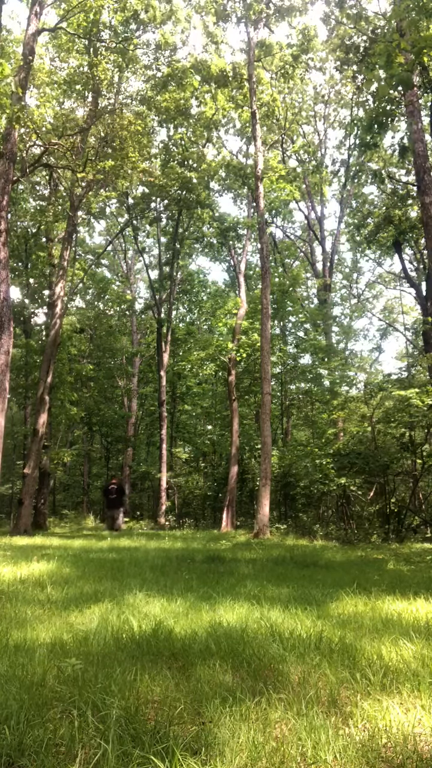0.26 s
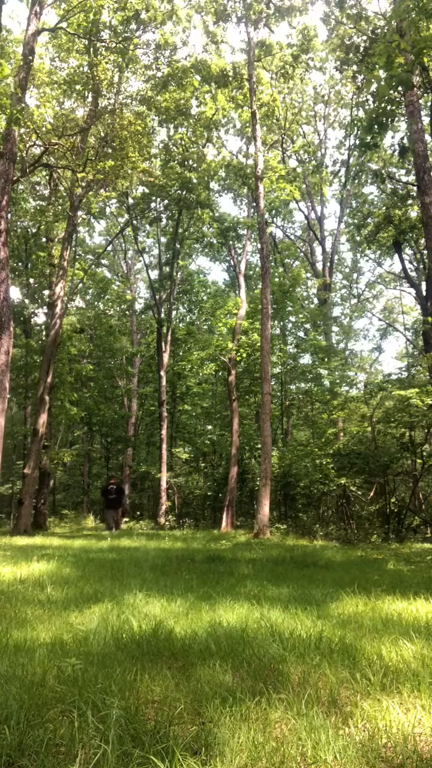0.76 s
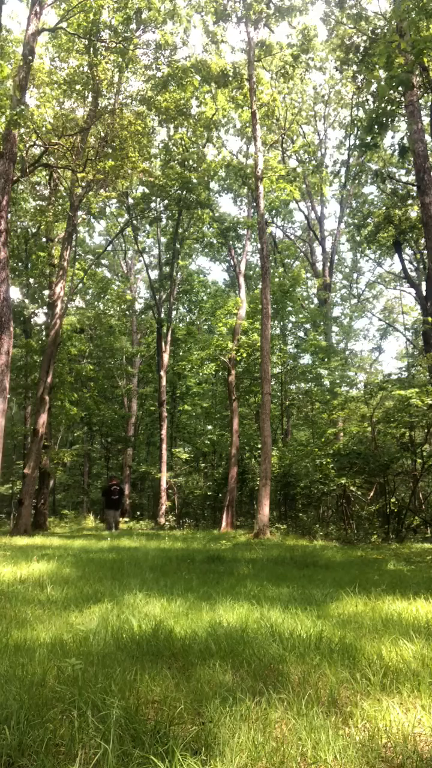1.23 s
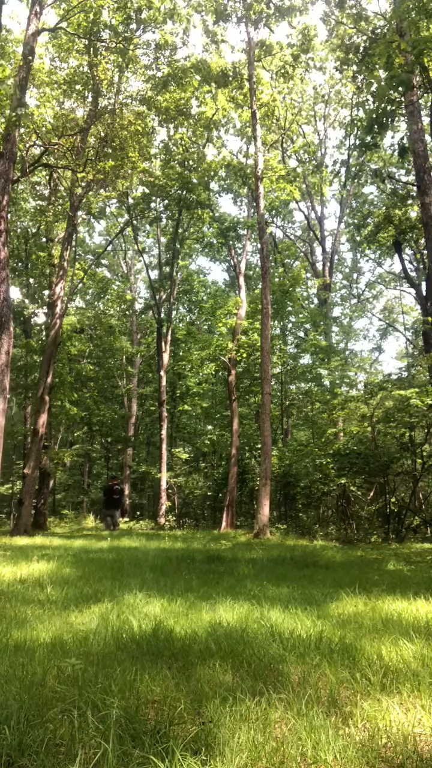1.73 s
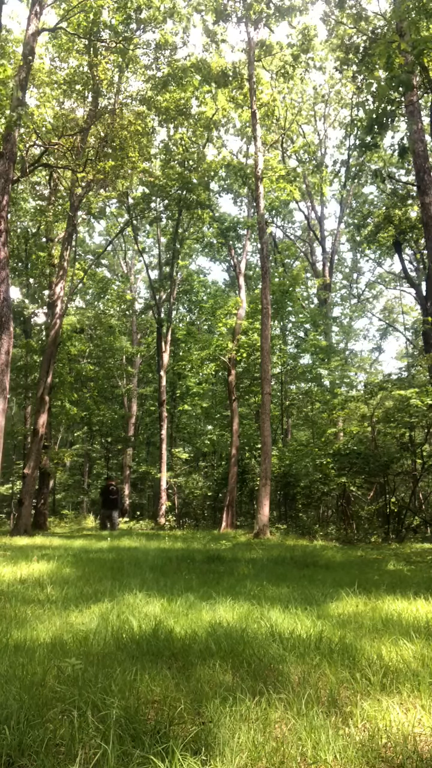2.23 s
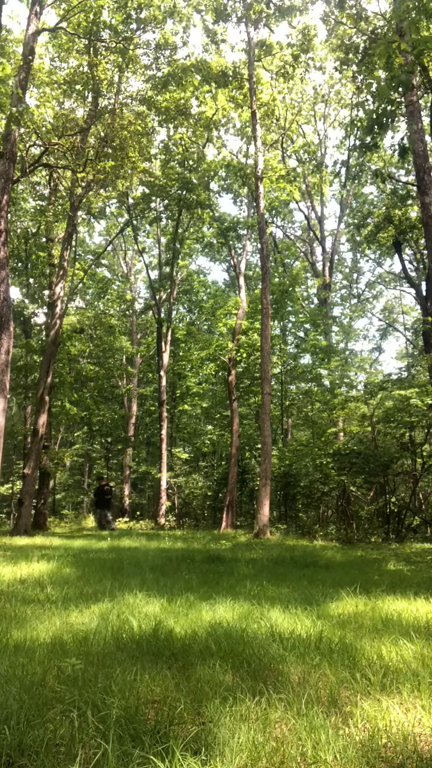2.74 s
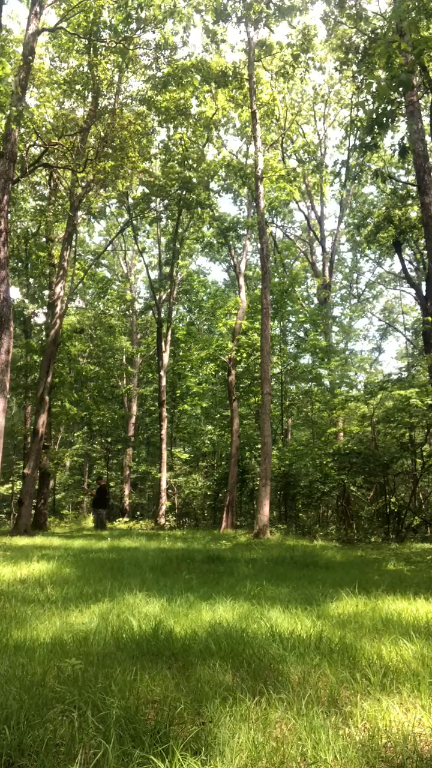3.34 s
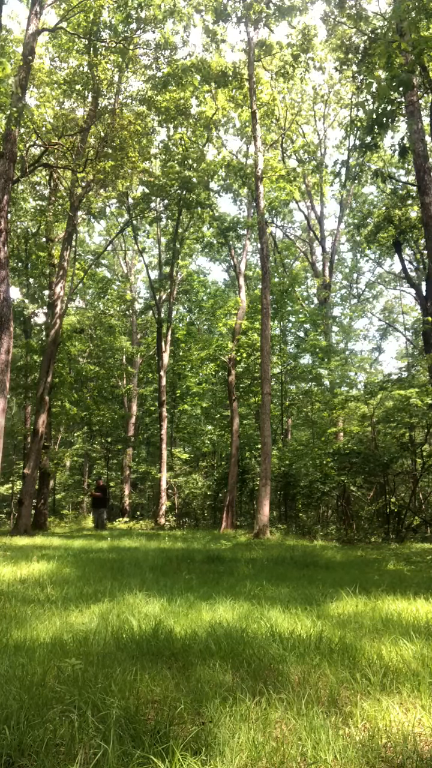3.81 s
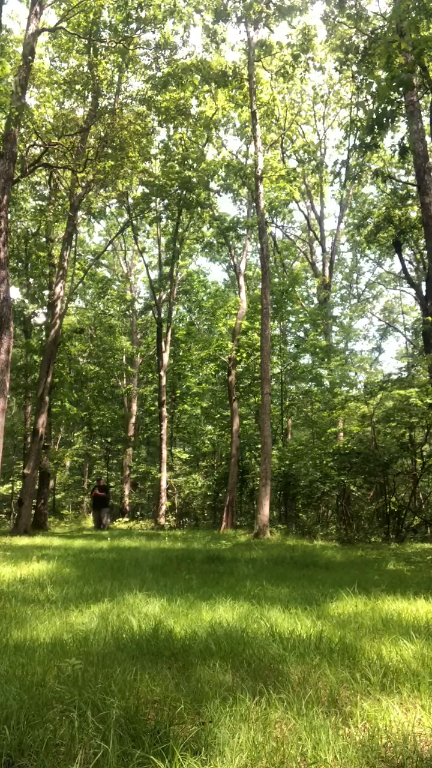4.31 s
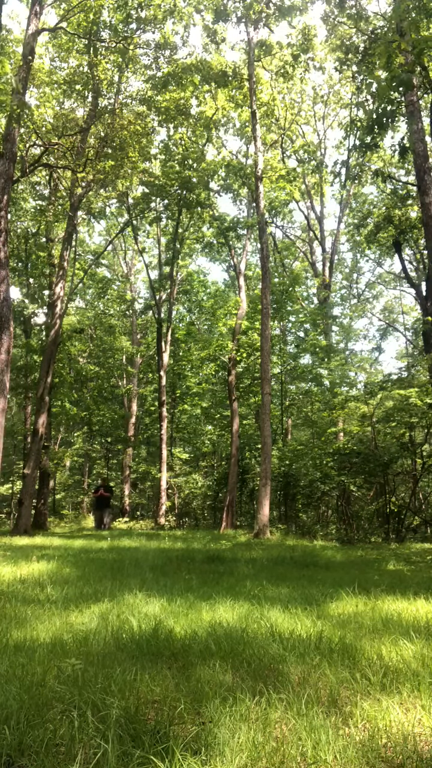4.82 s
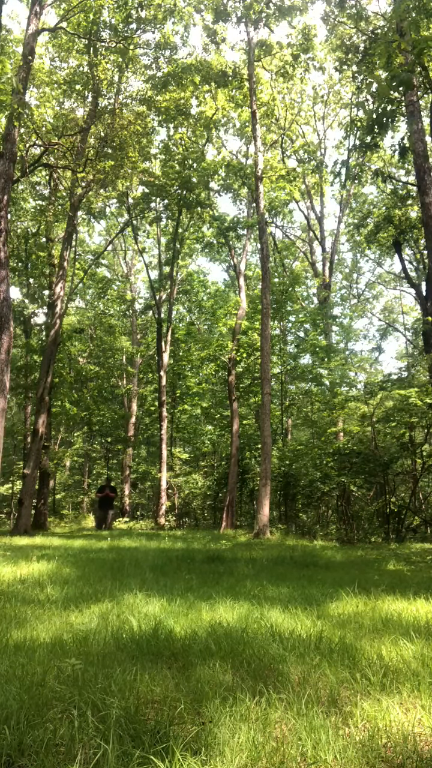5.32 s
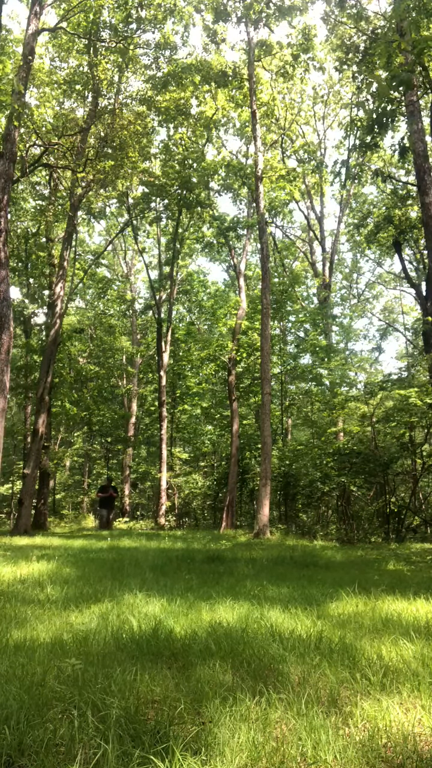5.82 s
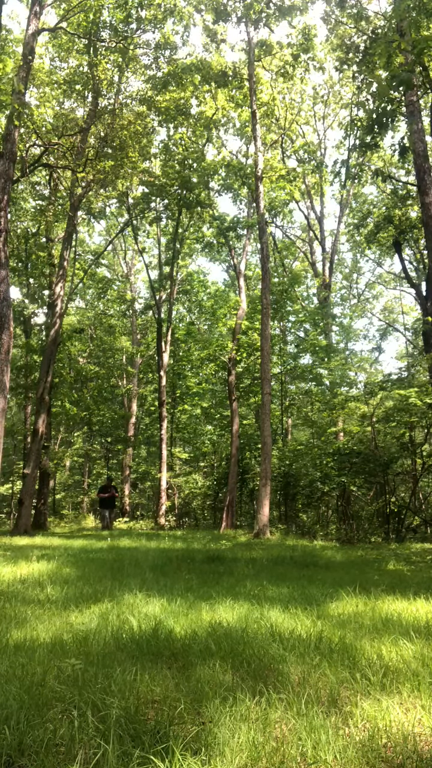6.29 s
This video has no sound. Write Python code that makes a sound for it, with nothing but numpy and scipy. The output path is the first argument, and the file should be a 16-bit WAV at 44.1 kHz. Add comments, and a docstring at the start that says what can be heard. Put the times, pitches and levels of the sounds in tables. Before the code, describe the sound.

Outdoors in a quiet forest clearing, four quick raspy turkey-like yelps from a wooden box call sound far off, each breaking from clear to hoarse. After a pause with faint bird whistles and dull microphone bumps, twenty nearer, shorter squeaky strokes follow, slowing and dropping in pitch, some cracking into rasp. Trees echo every note over soft air, low rumble and a distant engine hum.

```python
"""Box call in a forest clearing

Four raspy yelps come from far off, then a near run of twenty short strokes that slow down and sink in pitch.
The wooden lid sticks and slips on the box's lip, made of jittering harmonics and scraping noise; at times it
breaks into a lower rasp. Filtered noise bursts make the trees answer each note and the thin bird whistles.
Under it lie coloured-noise air and rumble, a distant engine's hum, a faint far tone and bumps on the microphone.
"""
import sys
import numpy as np
from scipy import signal
from scipy.fft import rfft, irfft, next_fast_len
from scipy.io import wavfile
from scipy.ndimage import map_coordinates

SR = 44100
rng = np.random.default_rng(int(sys.argv[2]) if len(sys.argv) > 2 else 0)


def unload_audio(sound):
    """Save the sound as a 16-bit wav file, at the path given as the first command line argument."""
    columns = np.transpose(np.atleast_2d(sound))
    # keep every value between -1 and 1, then stretch to whole-number steps
    steps = np.round(np.clip(columns, -1, 1) * 32767)
    wavfile.write(sys.argv[1], SR, steps.astype(np.int16))


N = 288855
LEAD = SR // 2  # samples of scene before time zero
TIME = np.arange(-LEAD, N) / SR  # s
TOP_HZ = 15800  # upper band limit at the microphone

# air in the trees: (frequency [Hz], relative density [dB per Hz])
AIR_SPECTRUM = [(15, -59), (25, -17.5), (59, -5), (122, -9.5), (152, -14), (227, -12.5), (260, -15),
                (421, -16), (523, -14.5), (582, -15), (848, -12), (2170, -28), (3630, -33), (5010, -36),
                (15500, -50.5)]
# low rumble: (frequency [Hz], relative density [dB per Hz])
RUMBLE_SPECTRUM = [(20, -24), (27, -22), (36, -14), (60, -3), (85, -6.5), (130, -16.5), (250, -32),
                   (600, -74)]
# hum of the distant engine, before its drift: (time [s], level [dB])
ENGINE_LEVEL = [(0, -66), (1.6, -65), (2.2, -72), (3.8, -61.5), (5.7, -57.5), (6.55, -63)]
# bumps on the microphone: (time [s], frequency [Hz], level [dB])
BUMPS = [(2.214, 57.6, -47), (2.53, 132, -50), (2.899, 123, -47), (3.162, 65, -45), (3.257, 114, -48.5)]
# bird whistles deep in the wood: (time [s], length [s], start pitch [Hz], end pitch [Hz], level [dB])
BIRD_NOTES = [(1.717, 0.14, 3560, 3830, -85), (1.855, 0.24, 3970, 4130, -85),
              (2.45, 0.081, 3640, 3660, -80), (2.539, 0.095, 3650, 3680, -80)]
# decay of the wood's answer: (frequency [Hz], time to fall 60 dB [s])
FOREST_DECAY = [(500, 0.14), (1500, 1.32), (2500, 1.16), (4500, 0.9), (8000, 0.69), (15000, 0.29)]
# what trunks and leaves scatter back: (frequency [Hz], gain [dB])
SCATTER = [(800, -9), (1450, 3), (1900, -7.5), (2150, -1.5), (2550, -2.5), (3100, 4.5), (4200, 7.5),
           (5200, 0), (7400, 6.5), (11000, 2.5), (15000, 3)]
# wood colour of the rubbing noise: (frequency [Hz], relative level [dB])
SCRAPE_COLOUR = [(600, -79), (1100, -68), (1400, -1), (1800, 6.5), (2400, -5.5), (3000, 8), (3500, -7),
                 (4500, -11.5), (6000, 0), (7000, -17.5), (10000, -24.5), (15000, -60)]
# far yelps: (start [s], break into rasp [s], end [s], rasp pitch at the end [Hz], level of the last judder [dB])
YELPS = [(-.06, -.025, .07, 1660, -50), (.251, .285, .357, 1690, -60), (.549, .564, .644, 1690, -40),
         (.846, .876, .94, 1560, -62)]
# clear front of a far yelp, on half its main tone: (multiple [1], level [dB])
CLEAR_PARTIALS = [(1, -8), (2, 1), (3, -15.5), (4, -23), (5, -30)]
# rasp of a far yelp, on a third of its main tone: (multiple [1], level [dB])
FAR_RASP_PARTIALS = [(2, -12), (3, -3), (4, -5), (5, -16), (6, -19), (7, -23), (8, -19.5), (9, -20.5),
                     (10, -18)]
# colour of the far yelps: (frequency [Hz], gain [dB])
DISTANCE_COLOUR = [(900, -25), (1300, 1.5), (6200, -3), (6900, -0.5), (8000, 9.5), (9000, 1), (11000, 11.5),
                   (15000, 10)]
# near strokes, level before the pressure curve: (time [s], length [s], main tone [Hz], level [dB])
STROKES = [(2.6603, 0.013, 2950, -50), (2.807, 0.021, 2912, -49.5), (2.967, 0.012, 2870, -48.5),
           (3.311, 0.013, 2760, -45.5), (3.4508, 0.02, 2799, -44), (3.619, 0.012, 2743, -48),
           (3.783, 0.021, 2736, -50.5), (3.95, 0.023, 2750, -48), (4.115, 0.019, 2640, -45.5),
           (4.2844, 0.021, 2670, -43), (4.457, 0.018, 2650, -40.5), (4.6406, 0.014, 2618, -41.5),
           (4.8325, 0.028, 2661, -40.5), (5.0317, 0.032, 2450, -38.5), (5.249, 0.034, 2410, -39.5),
           (5.4901, 0.0092, 2380, -38), (5.7374, 0.0084, 2380, -36), (6.0, 0.033, 2409, -41),
           (6.268, 0.04, 2436, -40.5), (6.527, 0.014, 2426, -40)]
# overtones through the near run, level before the pressure curve: (time [s], level [dB])
OVERTONE_LEVEL = [(2.66, -55), (3.42, -47.5), (3.8, -55), (4.6, -51), (5.4, -49), (6.0, -45.5),
                  (6.55, -50.5)]
# where the lid breaks into a near rasp: (time [s], length [s], mid-rasp pitch [Hz], nominal level [dB])
NEAR_RASPS = [(2.816, 0.009, 2126, -47), (2.975, 0.012, 2072, -50.5), (3.805, .028, 2064, -58.5),
              (5.043, 0.038, 1937, -52), (5.499, 0.029, 2079, -42), (5.743, 0.015, 1816, -38),
              (5.753, 0.02, 2134, -43), (6.01, 0.022, 1807, -46.5), (6.275, 0.025, 1876, -66),
              (6.536, 0.054, 1810, -36)]
# near rasp, on a third of its main tone: (multiple [1], level [dB])
CHATTER_PARTIALS = [(2, -12.5), (3, -1), (4, -11), (5, -8.5), (6, -22), (7, -22.5), (8, -15), (9, -18),
                    (10, -43), (12, -23)]
# how the box radiates the near strokes: (frequency [Hz], gain [dB])
BOX_COLOUR = [(900, -61), (1400, 3.5), (1900, 4.5), (2500, 6.5), (3000, -0.5), (3600, -2), (4200, 7.5),
              (5000, 1), (6400, -3), (7400, 3), (8800, -1.5), (10200, 5), (15000, -0.5)]
# the box turns toward the microphone: (time [s], echo level re direct sound [dB])
ECHO_LEVEL = [(2.6, -5), (5.1, -11), (6.3, -11.5)]

AIR_DB, AIR_RISE_DB_PER_S = -64, 0.8164  # level at time zero and its slow swell
RUMBLE_DB, RUMBLE_RISE_DB_PER_S = -73, 1.5
ENGINE_HZ = 100.4  # mean firing rate
# the faint far tone swells and stops
DRONE_SWELL_S, DRONE_END_S, DRONE_FADE_S, DRONE_HZ, DRONE_DB = 1.74, 2.55, 0.087, 528, -74
# clear front and rasp of every yelp, each at its start
CLEAR_HZ, CLEAR_DB, BREAK_HZ, RASP_DB = 2750, -41.5, 1980, -39.5
# near strokes share almost the same edge; pressing harder feeds only the main tone, so they sound purer
HALF_TONE_DB, THIRD_DB = -50, -54
# below this pitch the stick-slip cycle turns symmetric and its half-tone weakens
SYMMETRIC_BELOW_HZ, HALF_TONE_LOSS_DB = 2530, 1
OVERTONE_FALL, SYMMETRIC_FALL = 3.37, 0.66  # power of the order; extra in a symmetric stroke
BUILD_S, MEDIUM_DB = 0.00039, -41  # build-up time of a main tone at medium level; louder ones take longer


def amp(db):
    """Decibels to gain."""
    return 10 ** (np.asarray(db) / 20)


def unit(x):
    """Scale to rms 1."""
    return x / np.sqrt(np.mean(x ** 2) + 1e-20)


def at_time(points, s):
    """(time, value) points read at time s."""
    return np.interp(s, *np.transpose(points))


def along(points, hz):
    """(frequency, value) points read on a log frequency axis."""
    f, v = np.transpose(points)
    return np.interp(np.log(hz + 1), np.log(f + 1), v)


def wobble(rate, size):
    """A smooth random curve with rate knots a second."""
    knots = rng.standard_normal(int(size * rate / SR) + 4)
    return map_coordinates(knots, [np.arange(size) * rate / SR])


def step(t, width):
    """A soft switch from 0 to 1 around t = 0."""
    return .5 + .5 * np.tanh(t / width)


def turns(hz):
    """Running phase of a pitch curve, in radians."""
    return 2 * np.pi * np.cumsum(hz) / SR


def stack(phase, partials):
    """Harmonics of one phase, each at its rms level and a random starting phase."""
    total = 0
    for k, db in partials:
        total = total + np.sqrt(2) * amp(db) * np.sin(round(k) * phase + rng.uniform(0, 2 * np.pi))
    return total


def coloured(x, spectrum):
    """x filtered by (frequency, gain) points."""
    m = next_fast_len(len(x) + 2048)
    gain = amp(along(spectrum, np.fft.rfftfreq(m, 1 / SR)))
    return irfft(rfft(x, m) * gain, m)[:len(x)]


def noise(spectrum, size):
    """Coloured noise of rms 1."""
    return unit(coloured(rng.standard_normal(size), spectrum))


def add(track, s, x):
    """Mix x into the track at time s."""
    part = track[LEAD + round(s * SR):][:len(x)]
    part += x[:len(part)]


def forest(x, early_db, early_s, late_db):
    """x with scatter from near trunks and the wood's long answer, whose treble dies before its mids."""
    hz, t, z = signal.stft(rng.standard_normal((2, SR + SR // 4)), SR, nperseg=256)
    decay_db = -60 * t / along(FOREST_DECAY, hz)[:, None]
    shaped = z * amp(along(SCATTER, hz)[:, None] + decay_db)
    early, late = signal.istft(shaped, SR, nperseg=256)[1]
    t = np.arange(len(late)) / SR
    early = early * np.exp(-t / early_s) * step(t - .014, 0.0013)
    uneven = amp(2.7 * wobble(70.6, len(t)))  # single trunks make the tail uneven
    late = late * (1 - np.exp(-t / 0.003)) * uneven
    answer = amp(early_db) * early / np.linalg.norm(early) + amp(late_db) * late / np.linalg.norm(late)
    return signal.fftconvolve(x, answer + (t == 0))  # the 1 at t = 0 is the direct sound


def air():
    """Soft air in the trees: coloured noise that slowly swells."""
    return amp(AIR_DB + AIR_RISE_DB_PER_S * TIME) * noise(AIR_SPECTRUM, len(TIME))


def rumble():
    """Low rumble: bass noise that slowly swells."""
    return amp(RUMBLE_DB + RUMBLE_RISE_DB_PER_S * TIME) * noise(RUMBLE_SPECTRUM, len(TIME))


def engine():
    """A distant engine: a hum at its firing rate and a weak octave, drifting in pitch and level."""
    size = len(TIME)
    drift_db = 1.5 * wobble(6, size)
    pitch = ENGINE_HZ * (1 + 0.0062 * wobble(8.5, size))
    return stack(turns(pitch), [(1, -2.5), (2, -37.5)]) * amp(at_time(ENGINE_LEVEL, TIME) + drift_db)


def drone():
    """A faint, wavering tone far beyond the trees that swells and stops."""
    size = len(TIME)
    swell = np.exp(-((TIME - DRONE_END_S) / DRONE_SWELL_S) ** 2) * step(DRONE_END_S - TIME, DRONE_FADE_S)
    waver_db = 3 * wobble(11, size)
    pitch = DRONE_HZ * (1 + 0.012 * wobble(25, size))
    return swell * amp(DRONE_DB + waver_db) * stack(turns(pitch), [(1, 0)])


def microphone_bumps():
    """Dull handling bumps on the microphone: low sines under a bell a cycle or two wide."""
    out = np.zeros(len(TIME))
    for s, hz, db in BUMPS:
        bell = np.exp(-((TIME - s) * hz / 0.71) ** 2)
        out += amp(db) * bell * np.sin(2 * np.pi * hz * (TIME - s))
    return out


def bird():
    """A few thin whistles from deep in the wood: unsteady gliding sines, answered by the trees."""
    out = np.zeros(len(TIME))
    for s, length, from_hz, to_hz, db in BIRD_NOTES:
        size = int(length * SR)
        pitch = np.linspace(from_hz, to_hz, size) * (1 + 0.032 * wobble(58, size))
        add(out, s, amp(db) * np.hanning(size) * np.sqrt(2) * np.sin(turns(pitch)))
    return forest(out, early_db=-4, early_s=0.056, late_db=-13)[:len(TIME)]


def fluttering(phase, partials, flutter_db):
    """Harmonics whose levels each waver quickly and independently, making the note lumpy and rough."""
    total = 0
    for partial in partials:
        flutter = amp(flutter_db * (wobble(211.3, len(phase)) - 0.34))
        total = total + stack(phase, [partial]) * flutter
    return total


def slips(size, rate, spread_db):
    """Scraping grain: irregular little slips (rate a second) of uneven size, coloured by the wood."""
    kicks = (rng.random(size) < rate / SR) * amp(spread_db * rng.standard_normal(size))
    return unit(coloured(kicks, SCRAPE_COLOUR))


def far_yelps():
    """Long strokes: a clear falling whistle breaks into a lower rasp that frays and ends in a judder."""
    out = np.zeros(len(TIME))
    t = np.arange(SR // 5) / SR
    for start, crack, end, low_hz, judder_db in YELPS:
        now = start + t
        worn = np.clip((now - crack) / (end - crack), 0, 1)  # 0 at the break, 1 at the end
        broken = step(now - crack, .003)

        front_hz = CLEAR_HZ * (1 - 0.058 * np.minimum(t / (crack - start), 1.2) ** 2)
        front_jitter = 0.022 * wobble(800, len(t))
        front = stack(turns(front_hz / 2 * (1 + front_jitter)), CLEAR_PARTIALS) * (1 - np.exp(-t / 0.018))

        shake = (.011 + .04 * worn ** 3) * wobble(700, len(t))
        back_hz = (BREAK_HZ + (low_hz - BREAK_HZ) * np.sqrt(worn)) * (1 + shake)
        # the lid holds less evenly as the stroke runs out
        grip = amp(-9 * worn ** 2 + (-1.5 + 3.6 * worn) * wobble(353, len(t)))
        catch = 1 - .45 * np.exp(-worn / .2)  # the rasp starts weaker, then catches
        back = fluttering(turns(back_hz / 3), FAR_RASP_PARTIALS, flutter_db=2.5) * grip * catch
        rub = amp(-18 + 7.2 * worn) * slips(len(t), rate=900, spread_db=-2.5)
        release = step(end - now, .003)

        jolt = np.exp(-((now - end + 0.011) / 0.0064) ** 2)  # just before the end
        judder_hz = low_hz * (1 + 0.134 * wobble(900, len(t)))
        judder = amp(judder_db) * jolt * stack(turns(judder_hz / 3), FAR_RASP_PARTIALS)

        clear_part = amp(CLEAR_DB) * (1 - broken) ** 2 * front
        rasp_part = amp(RASP_DB) * broken * release * (back + rub)
        yelp = coloured(clear_part + rasp_part + judder, DISTANCE_COLOUR)
        add(out, start, forest(yelp, early_db=-9.0, early_s=0.16, late_db=-2.0))
    return out


def near_rasp(length, hz, db):
    """The lid chatters in a slower, uneven cycle that sags in pitch."""
    t = np.arange(SR // 12) / SR
    jitter = .016 * wobble(800, len(t))
    pitch = hz * (1 + 0.018 * (.5 - t / length)) * (1 + jitter)
    partials = fluttering(turns(pitch / 3), CHATTER_PARTIALS, flutter_db=2.5)
    chatter = partials + amp(-7.5) * slips(len(t), rate=1100, spread_db=1.5)
    attack = 1 - np.exp(-t / 0.00053)
    return amp(db + 2.5 - 3 * t / length) * attack * step(length - t, 0.0019) * chatter


def edge_levels(s, hz, db):
    """Half-tone, third partial and overtones in dB re the main tone, and how steeply the overtones fall."""
    symmetric = step(SYMMETRIC_BELOW_HZ - hz, 50)
    half_db = HALF_TONE_DB - HALF_TONE_LOSS_DB * symmetric
    over_db = at_time(OVERTONE_LEVEL, s)
    return half_db - db, THIRD_DB - db, over_db - db, OVERTONE_FALL + SYMMETRIC_FALL * symmetric


def stroke(s, length, hz, db):
    """One short swipe of the lid: a sharp, high bite that settles on the lip's tone."""
    t = np.arange(SR // 12) / SR
    half_db, third_db, over_db, fall = edge_levels(s, hz, db)
    bite = np.exp(-t / 0.0026)
    # a half-tone strong against the main tone marks a hard, lopsided stick-slip cycle
    lopsided = min(amp(half_db + 14), 1) ** 0.35
    settle = 1 + 0.068 * step(.004 - t, 0.0011)
    jitter = (.006 + .02 * bite * lopsided) * wobble(1200, len(t))
    phase = turns(hz / 2 * settle * (1 + jitter))

    orders = np.arange(4, 13)  # of the half-tone
    # overtones fall with their order; a more symmetric cycle weakens the odd ones
    weights = (orders / 4) ** -fall * np.where(orders % 2, lopsided ** 0.17, 1)
    overtones = zip(orders, over_db + 20 * np.log10(weights / np.linalg.norm(weights)))
    edge = fluttering(phase, [(1, half_db), (3, third_db), *overtones], flutter_db=5.0)
    edge = edge * (0.85 + .5 * bite * lopsided)

    swell = 1 - np.exp(-t / (BUILD_S * amp(db - MEDIUM_DB)))
    tone = swell * fluttering(phase, [(2, 1)], flutter_db=2.8 * lopsided)
    rub = amp(over_db - 4.5) * (0.64 + 3 * bite) * noise(SCRAPE_COLOUR, len(t))
    attack = 1 - np.exp(-t * lopsided / 0.0014)
    pressure = attack * amp(-8 * (t / length - 0.5531)) * step(length - t, 0.078 * length)
    return amp(db) * pressure * (tone + edge + rub)


def near_call():
    """The run of short strokes and their rasps close by, each answered by the wood."""
    out = np.zeros(len(TIME))
    notes = [(s, stroke(s, *row)) for s, *row in STROKES]
    notes += [(s, near_rasp(*row)) for s, *row in NEAR_RASPS]
    for s, note in notes:
        echo_db = at_time(ECHO_LEVEL, s)
        radiated = coloured(note, BOX_COLOUR)
        add(out, s, forest(radiated, early_db=echo_db - 0.5, early_s=0.072, late_db=echo_db))
    return out


def scene():
    """Far and near sounds in the same wood, heard from time zero on."""
    background = air() + rumble() + engine() + drone() + microphone_bumps()
    return (background + bird() + far_yelps() + near_call())[None, LEAD:]


def record(dry):
    """The microphone chain keeps nothing above its band limit; the last two milliseconds fade out."""
    m = next_fast_len(N + 8192)
    fade = np.minimum(np.arange(N)[::-1] / (.002 * SR), 1)
    in_band = np.fft.rfftfreq(m, 1 / SR) < TOP_HZ
    return irfft(rfft(dry * fade, m) * in_band, m)[..., :N]


dry = scene()
out = record(dry)
unload_audio(out)
```